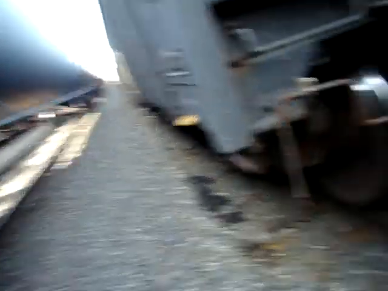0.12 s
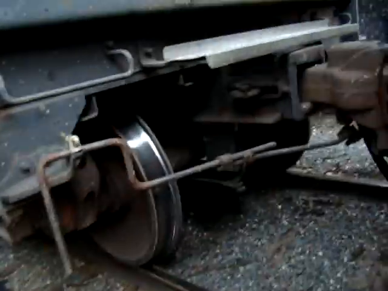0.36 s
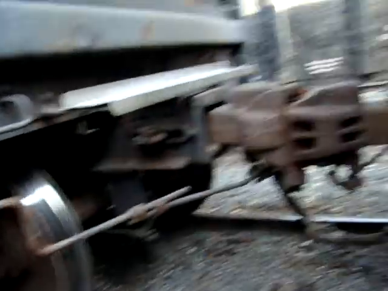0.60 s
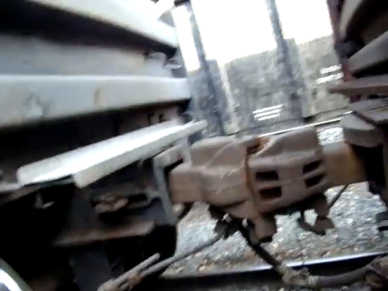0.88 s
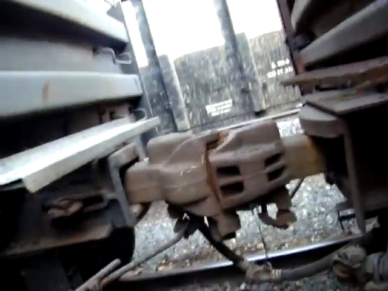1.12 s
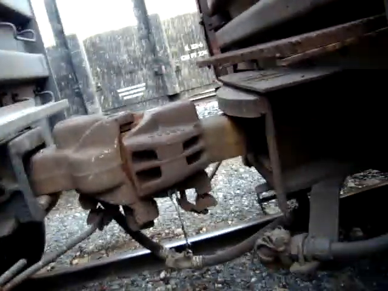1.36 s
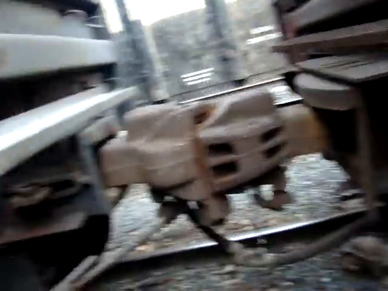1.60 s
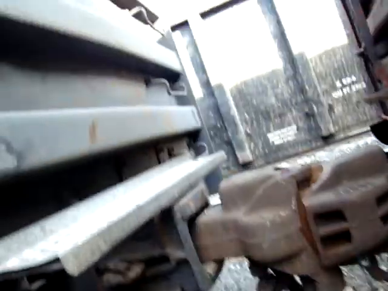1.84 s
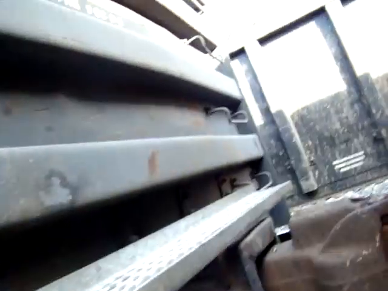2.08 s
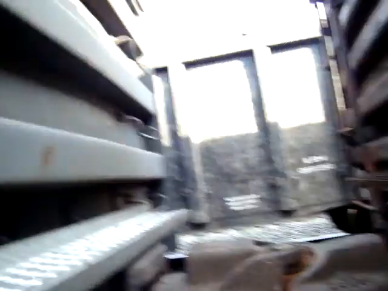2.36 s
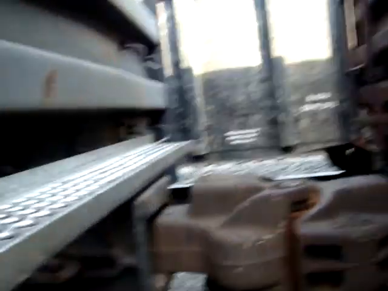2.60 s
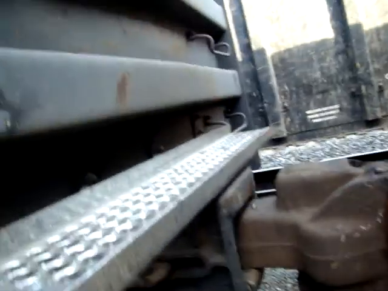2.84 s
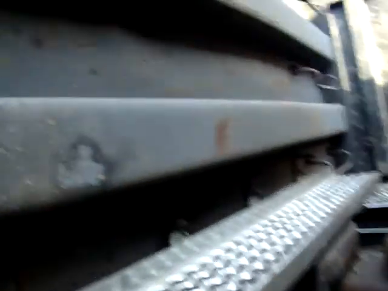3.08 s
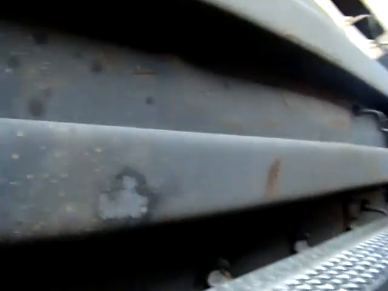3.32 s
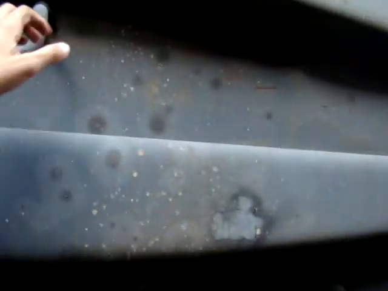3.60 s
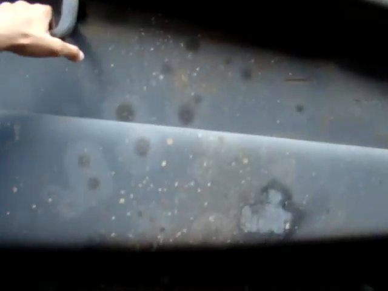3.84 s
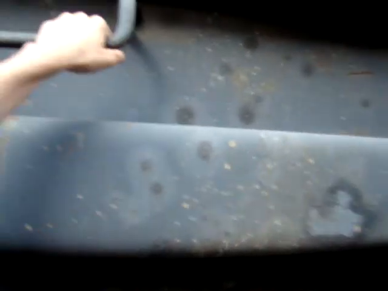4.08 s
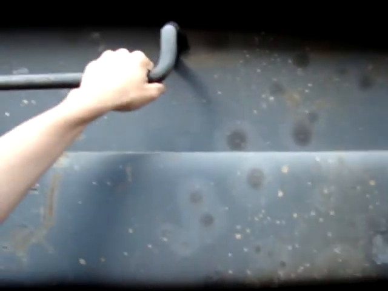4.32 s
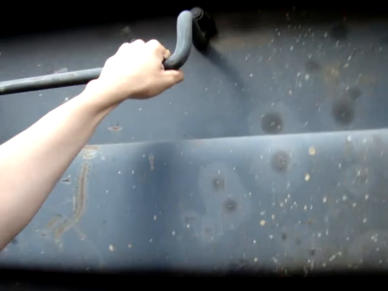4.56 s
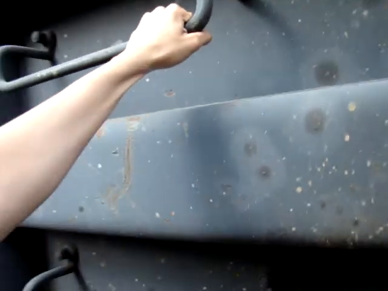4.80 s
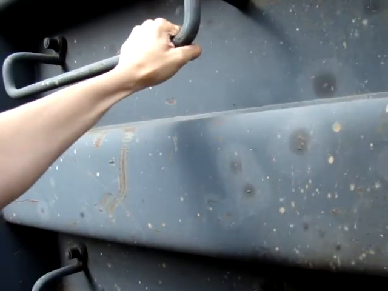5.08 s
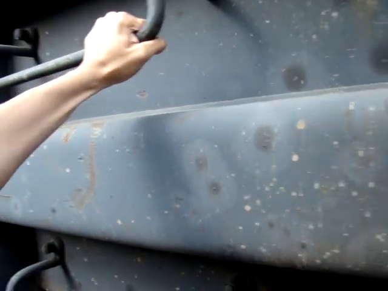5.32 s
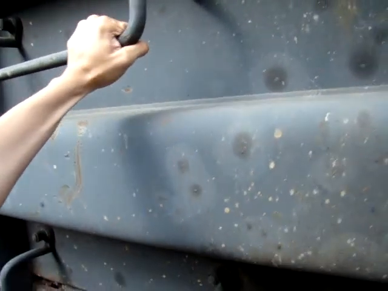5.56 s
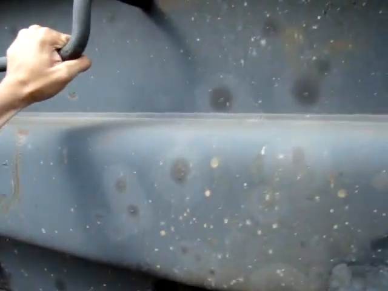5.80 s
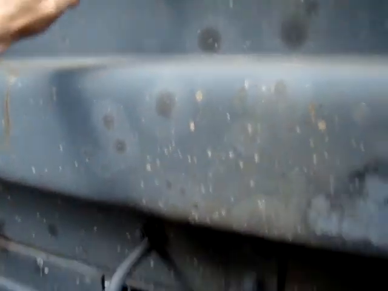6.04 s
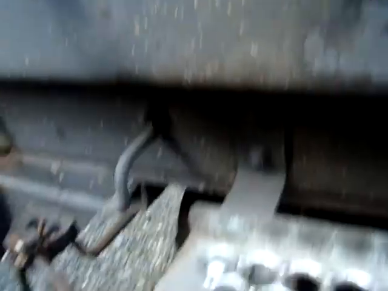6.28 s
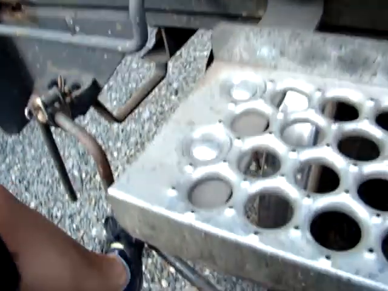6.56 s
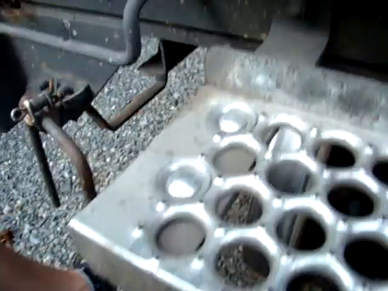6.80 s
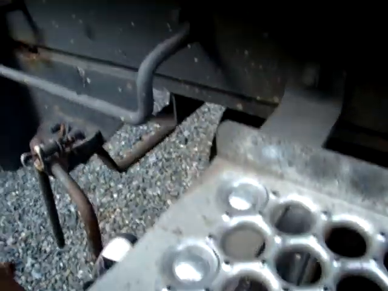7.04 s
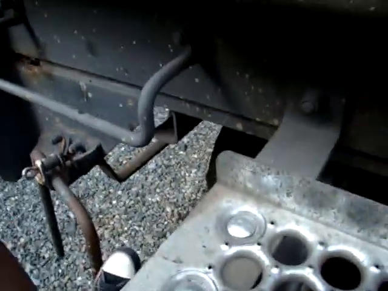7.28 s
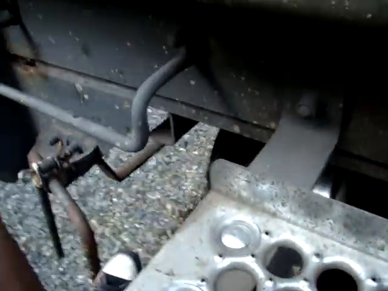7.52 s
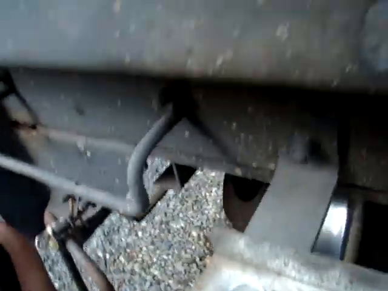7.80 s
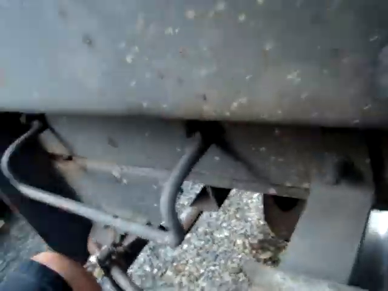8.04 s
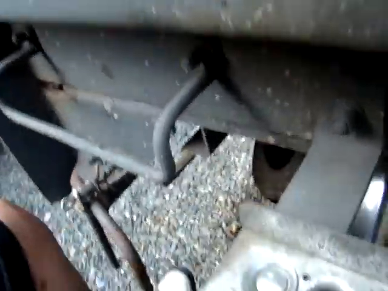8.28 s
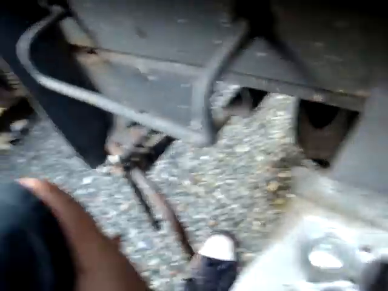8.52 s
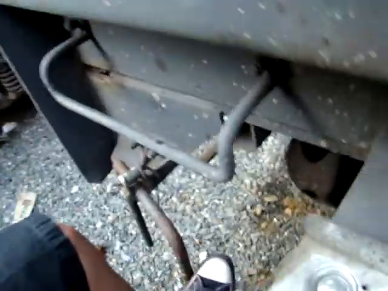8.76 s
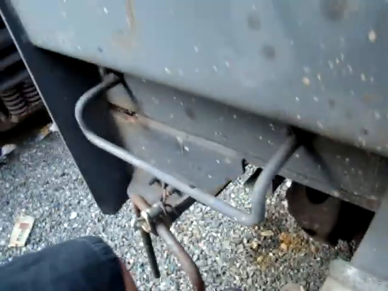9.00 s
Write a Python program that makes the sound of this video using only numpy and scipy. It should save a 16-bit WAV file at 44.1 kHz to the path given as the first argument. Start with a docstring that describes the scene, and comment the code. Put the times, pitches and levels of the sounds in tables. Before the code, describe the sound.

Close, rough handling knocks and gravel crunching give way to a quieter stretch of fine lens ticking, scattered taps, one hard metallic bang and faint squeaks.

```python
"""Footsteps on loose ballast

Someone walks on loose stones between parked freight cars and climbs onto a steel step, small camera in hand.
Stones crunch and slide as showers of short noise scratches, and cloth rustles as swells of shaped hiss.
Every jolt and knock sends a blow and rough noise through resonances: the hollow camera case rings.
The lens drive ticks 59.94 times a second, thin squeals are trembling sine tones, and steel parts sing and fade.
Shaped noise makes the drone of the yard, the puffs of wind and the hiss of the microphone."""
import sys
import numpy as np
from scipy import signal
from scipy.fft import rfft, irfft, next_fast_len
from scipy.io import wavfile
from scipy.ndimage import uniform_filter1d

SR = 44100
rng = np.random.default_rng(int(sys.argv[2]) if len(sys.argv) > 2 else 0)


def boost_factor(decibels):
    """Convert a level in decibels to a linear amplitude factor."""
    exponent = np.asarray(decibels, float) / 20
    return 10 ** exponent


def output_pcm(signal):
    """Save a mono or channel-first signal as 16-bit PCM at the path in sys.argv[1].

    Samples are clipped to [-1, 1] before scaling.
    """
    pcm = np.clip(np.atleast_2d(signal).T, -1, 1) * 32767
    wavfile.write(sys.argv[1], SR, np.round(pcm).astype(np.int16))


N = 403074  # length in samples

# All source levels are those ahead of record(), which bends and scales the mix.
# Resonance widths are for one pass of the filter; ring() makes two.

# Steady noise of the yard. Each row: frequency in Hz, strength per Hz in dB.
YARD_SPECTRUM = [(15, -73), (25, -33), (50, -13.5), (100, -20.5), (210, -7), (274, -4.5), (366, -7.5),
                 (760, -10.5), (1040, -8), (1240, -7.5), (1480, -10), (1760, -8.5), (2110, -16.5),
                 (2870, -13), (5000, -19), (6500, -21.5), (7500, -32), (7850, -21), (8200, -27.5),
                 (11000, -40)]
YARD_DB, HISS_DB = -49, -57
# Far engines. Each row: frequency in Hz, width in Hz, level in dB before it wavers.
ENGINES = [(289, 37, -60), (155.3, 32, -63.5)]
# Puffs of wind and arm swing on the microphone. Each row: peak time in seconds, half length in seconds,
# level in dB before the gusts.
PUFFS = [(0.096, 0.088, -42.5), (0.282, 0.036, -50), (0.527, 0.13, -52), (1.317, 0.031, -57),
         (1.53, 0.04, -56), (2.134, 0.094, -66), (3.466, 0.045, -56), (3.595, 0.016, -53),
         (3.696, 0.013, -60), (3.903, 0.034, -59), (4.83, 0.016, -43), (5.975, 0.049, -55),
         (5.82, 0.015, -56), (6.14, 0.01, -53), (6.188, 0.013, -49), (6.306, 0.035, -59), (8.056, .15, -67),
         (8.9, 0.066, -53)]
CALM_DB = -66.5  # rumble between the puffs

# Shoes pressing into the stones. Each row: start in seconds, hold in seconds, level of the grit in dB,
# level of the stone bed in dB.
STEPS = [(0.01, 0.14, -33.5, -36), (0.591, 0.12, -37.5, -41.5), (0.82, 0.074, -70, -50),
         (1.046, 0.26, -51, -53.5), (1.264, 0.11, -33.5, -38), (1.476, 0.091, -34, -38),
         (1.71, 0.97, -44.5, -50.5), (2.117, 0.086, -33.5, -35), (2.684, 0.18, -46.5, -46),
         (4.784, 0.14, -62, -47.5), (5.652, 0.51, -61, -56), (6.243, 0.087, -69, -40),
         (6.38, 0.11, -58, -41.5), (6.53, 0.054, -79, -41), (6.732, 0.19, -50, -58),
         (7.63, 0.018, -46, -74), (8.57, 0.23, -52.5, -50), (8.79, 0.49, -47, -49)]
STEP_RISE_S, STEP_T60_S = 0.013, 0.71
REST_GRIT_DB, REST_BED_DB = -55, -58  # stones keep shifting between the steps
# Colour of the grit. Each row: frequency in Hz, strength per Hz in dB.
GRIT_SPECTRUM = [(1200, -15.5), (2000, -12.5), (3000, -8), (4500, -4.5), (6500, -7.5), (8500, -5.5),
                 (11000, -10)]
TREBLE_WAVER_DB = 2.5  # the level of the grit's top wavers at random
# Ringing of stones of four sizes: one frequency in Hz for each.
CLACK_HZ = [1000, 1490, 2020, 2700]
CLACK_DB = -14  # against the grit
# Rustle of the case in the hand. Each row: time in seconds, level in dB.
GRIP = [(0, -43), (.2, -34.5), (.36, -52), (.55, -38.5), (.9, -52), (1.07, -30.5), (1.25, -45.5),
        (1.45, -37), (1.62, -39), (1.88, -34), (2.1, -41.5), (2.47, -43.5), (2.87, -39), (3.1, -59),
        (3.3, -45), (3.94, -47.5), (4.3, -56), (4.81, -49), (5.4, -61.5), (5.83, -49), (6.46, -54.5),
        (6.7, -74), (6.9, -52), (7.05, -63), (7.69, -54), (8.3, -58), (8.63, -49.5), (9.14, -46.5)]

# Soft even hiss, as of cloth sliding. Each row: start, rise, hold and fall in seconds, level in dB
# before it flutters.
RUSTLES = [(.01, .02, 0.094, 0.089, -44), (.22, .03, 0.088, 0.054, -49.5), (0.402, .03, 0.094, .03, -59.5),
           (.59, 0.018, 0.15, .05, -47.5), (0.756, .02, 0.11, 0.017, -53.5), (1.038, .02, 0.16, .03, -52),
           (1.265, 0.018, 0.38, 0.087, -47), (1.656, 0.027, .4, .04, -54.5), (2.129, .02, 0.12, .15, -40),
           (2.3, 0.042, 0.21, 0.25, -54), (4.796, .07, 0.078, .06, -51.5), (7.636, .01, 0.026, .03, -53),
           (5.607, 0.094, 0.55, .04, -46.5), (6.742, .06, 0.2, .04, -51.5), (8.536, 0.12, .4, .1, -47)]
# Colour of that hiss. Each row: frequency in Hz, strength per Hz in dB.
RUSTLE_SPECTRUM = [(400, -14), (1000, -1.5), (2500, 1), (5000, -2), (8000, 0), (11000, -8)]

# Ringing of one lens step. Each row: frequency in Hz, width in Hz, gain in dB.
TICK_MODES = [(1824, 330, -21), (1282, 240, -6), (3000, 400, -17)]
# Lens steps with a level of their own, loud or faint. Each row: time in seconds, peak level in dB.
SET_TICKS = [(3.2326, -29.5), (3.5663, -28), (3.934, -30.5), (4.0677, -33), (4.1011, -33), (4.1345, -29),
             (4.1829, -32), (4.2014, -29.5), (4.2338, -27), (4.4009, -30), (4.4493, -49), (4.4677, -29),
             (4.5346, -32), (4.6354, -31), (4.6683, -29), (4.7346, -35), (4.7691, -38), (5.002, -31),
             (5.2684, -41), (5.4854, -42), (5.6027, -34), (5.6695, -35), (5.7364, -41), (5.9354, -40),
             (6.0023, -31), (6.4852, -46), (6.5036, -32), (6.5705, -39), (6.6189, -34), (6.6518, -41),
             (6.6852, -39), (6.9694, -51), (7.2379, -40), (7.2858, -33), (7.3043, -30), (7.4195, -34),
             (7.4864, -42), (7.6196, -34), (7.9199, -47), (8.105, -31), (8.1863, -42), (8.2531, -43),
             (8.3205, -39), (8.4387, -30), (8.539, -39)]
TICK_START_S, TICKS_PER_S = .0115, 59.94
TICK_DB, WEAK_TICK_DB = -34, -5  # loudest of the other steps; how much every second one is weaker
TICK_SCATTER_DB = 9  # each of them is quieter by a random amount up to this

# Jolts and knocks. Each row: start in seconds, case ring in dB, then upper case ring, scrape and thud in dB
# relative to the case ring. These are peak levels.
KNOCKS = [(.039, -24, -2.5, -13, 2.5), (0.102, -31.5, -10, -6.5, 6.5), (0.1728, -26, 7.5, -16, -24),
          (0.1851, -13.5, 0, 3, -23), (0.2513, -29.5, -8, 9, 0), (0.4092, -23, -1.5, -27, -17),
          (0.4211, -19.5, 2.5, 5.5, -18), (.434, -22, -2, -13.5, -12), (0.557, -19.5, 0.5, 3.5, -14),
          (0.5643, -25, 5, 7.5, -18), (0.586, -31, -11, -17, -16), (0.607, -31.5, -21, 7.5, -13),
          (0.732, -24, -20, -14, -1), (0.749, -28.5, -11, -22, -4), (0.7638, -20, -1.5, -4.5, -12),
          (0.801, -20, 2, -3, -24), (0.827, -20, 0, 0.5, -36), (0.865, -24.5, 0, -6, -17),
          (0.8707, -30.5, 9.5, -18, -11), (0.8832, -23, 1, -5, -19), (.952, -24.5, 2.5, -1, -10),
          (.969, -19, -2, -54, -31), (1.059, -25.5, 2.5, -1, -21), (1.0686, -28, -1, -7, -23),
          (1.099, -31, 5, 2.5, -24), (1.126, -41, -1, -14.5, -25), (1.191, -39, 0, 1, -9),
          (1.288, -31.5, -11, 5, 2), (1.3043, -18, -4.5, 5.5, 0.5), (1.321, -27, -5, -32, -9),
          (1.344, -28.5, -11, 5.5, 4), (1.4361, -18.5, -3.5, -3, -8), (1.448, -15, -6, -28, -8.5),
          (1.475, -18, -2.5, 5.5, -14), (1.495, -23, 1, -11.5, -3), (1.512, -26, -13, -20, -3),
          (1.684, -25, -4, -27, -52), (1.717, -15.5, -2, -1, -29), (1.787, -16.5, 1.5, 3, -15),
          (1.812, -13, -0.5, -40, -17), (1.828, -13.5, -2, 5.5, -29), (1.836, -19, -13, -7.5, -24),
          (1.8504, -23.5, -1, -19, -23), (1.8741, -24.5, 7, 4, -17), (1.897, -20.5, -2.5, 3.5, -33),
          (1.93, -26, -4, 2, -18), (1.94, -22, 2, -2.5, -21), (1.9507, -21, 0, 2.5, -17),
          (1.9661, -20, -3, -7, -12), (1.986, -15, -7, -37, -16), (2.025, -29, -22, 1, -8),
          (2.082, -45.5, -6, 14, -13), (2.1438, -25.5, -21, 4.5, -0.5), (2.183, -31, -11, -5.5, -9),
          (2.203, -29.5, -1, 2.5, -8), (2.221, -29.5, -13, -7, -2), (2.236, -35, -8, 2, 7),
          (2.383, -33.5, -3, 8, 3), (2.424, -33, -3, 6, -6), (2.4054, -26.5, -4, -24, -7),
          (2.4637, -14.5, -2, 3, -28), (2.4725, -18, 2.5, -35, -3), (2.486, -24, -9, -38, -5),
          (2.495, -20, -5, -33, -7), (2.5065, -17, 4.5, -12, -17), (2.534, -26, 5.5, -0.5, -22),
          (2.7396, -27.5, -15, -4.5, -12), (2.789, -28, -21, -22, -17), (2.82, -29, -18, -12, -7),
          (2.8393, -35, -12, -8, 4), (2.865, -41, 4, -8, -10), (2.889, -26.5, -15, -14.5, -28),
          (3.135, -29.5, -1, -18, 11.5), (3.1965, -30, 0, -2, -6), (3.314, -36, -2.5, -1, -7),
          (3.3827, -27.5, 0, -8.5, -13), (3.5246, -27.5, -6, -5.5, -9), (3.599, -31.5, -10, -5, -3),
          (3.6928, -30, -4, -10, -7), (3.782, -24, -12, -5.5, -16), (3.8006, -25, -10, -15, -9),
          (3.8833, -25, -9.5, -21, -11), (3.8961, -32, -3, -23, -12), (4.867, -29, -5, -3.5, -19),
          (4.887, -30.5, -11, -12, -14), (4.965, -38, -12, -15, -12), (4.915, -24, -15, -9, -8.5),
          (5.153, -32.5, -6, -20, -24), (5.197, -32, -3, -10, -16), (5.2603, -37, 2.5, -13, -6),
          (5.5537, -24.5, -12, -11, -16), (5.568, -21.5, -18, -22, -27), (5.816, -34.5, -1, 10.5, -1.5),
          (5.8504, -34.5, 1.5, -3.5, -24), (5.9998, -36.5, -15, -7.5, -15), (6.056, -20.5, -27, -13, -12),
          (6.072, -14, -9, -12, -28), (6.0934, -28, -8, -1, -15), (6.169, -32, -2, -15, -20),
          (6.183, -43, -10, -13, 6), (6.2679, -20.5, -29, -30, -8), (6.3375, -17.5, -4, -4.5, -24),
          (6.3507, -24, 2.5, -19, -8), (6.422, -27, -8, -23, -15), (6.562, -34.5, -2, -25, 2),
          (6.759, -31, -4, -12, -11), (6.772, -37, -8, -18, -11), (6.888, -30, -17, -18, -12),
          (7.1295, -28.5, -7, -8, -23), (7.1677, -34.5, -0.5, -15, -14), (7.356, -36.5, 0, -4, -26),
          (7.3666, -29.5, -17, -14, -12), (7.72, -28.5, -7, -5, -14), (7.845, -32.5, -13, -19, -5),
          (7.869, -35, -0.5, 4, -5), (8.0214, -28, -5, -4, -9), (8.334, -36, 3, -20, -15),
          (8.369, -37, 1, -14, -11), (8.6582, -34, 8, 8, -4), (8.71, -34.5, 3, 6, 0),
          (8.823, -25, -8, -2, -12), (8.9278, -36.5, 9.5, 3, -2)]
# Hard blows and footfalls. Each row: the five columns of the knocks, then skid in seconds, its t60 in seconds,
# how long the push is held in seconds, its t60 in seconds, size of the first contact (a plain factor),
# top of the scrape in Hz, rise in seconds.
STOMPS = [(0.4705, -8, -5, 1, -40, 0.0075, 0.012, 0.0025, 0.016, 0.2, 11900, 0.0015),
          (0.9873, -2, -10, -2.5, -16.5, 0.025, 0.087, 0.0099, 0.017, 1.5, 12100, 0.001),
          (2.5089, -3.5, -5.5, 1, -47, 0.0055, 0.015, .003, 0.0079, 1.2, 12300, 0.0016),
          (2.6573, -11.5, -5.5, -9, -40, 0.0012, .016, .001, 0.047, 1.1, 9000, 0.0014),
          (3.101, -26, 9.5, 14.5, 18.5, 0.013, 0.14, .001, 0.062, 1.5, 4430, 0.00069),
          (3.4185, -9.5, -5.5, -1, -24.5, 0.0033, 0.0099, 0.0049, 0.024, 0.28, 12000, 0.0024),
          (6.718, -2, -4.5, -1.5, -19, 0.00053, 0.0052, 0.00079, 0.024, 1.8, 6000, 0.001),
          (9.1095, -34, 8, 15.5, 4.5, 0.0011, 0.022, .001, 0.034, 0.75, 4930, 0.001)]
# Lower ringing of the hollow case. Each row: frequency in Hz, width in Hz, gain in dB.
CASE_LOW = [(1168, 356, 5), (1263, 303, 6.5)]
# Upper ringing of the case. Each row: frequency in Hz, width in Hz, gain in dB.
CASE_HIGH = [(1747, 254, -1.5), (2224, 590, -4)]
# Thin part of the case that scrapes excite. Each row: frequency in Hz, width in Hz, gain in dB.
SHELL = [(4630, 180, -6)]
# Dull ringing of struck things and of the stone bed. Each row: frequency in Hz, width in Hz, gain in dB.
THUD = [(409, 315, -4), (507, 336, -0.5), (854, 500, -3.5)]
GRIP_SHIFT = 0.033  # typical share by which the case rings higher or lower from knock to knock
BLOW, SETTLE = 1, 0.084  # size of the first contact and of the long tail, against the push
CRACK_S, CRACK = 0.0026, 0.58  # decay and size of the crack at first contact
CLATTER_DB = 2.5  # a scrape breaks up into separate contacts
SCRAPE_T60_S = 0.017  # of a knock
PUSH_T60_S, SCRAPE_TOP_HZ = 0.038, 6000  # of a knock at -30 dB
HARD_SHORTER, HARD_BRIGHTER = 0.011, 0.12  # for each dB above that: push shorter, scrape top higher (shares)
SOFT_EDGE, SOFT_RISE_S = 0.58, 0.0027  # knocks have this share of the first contact and swell over this time

# Soft bumps of the hand on the case. Each row: peak time in seconds, half length in seconds, frequency in Hz,
# level in dB.
BUMPS = [(.07, .03, 74.4, -39), (.135, 0.03, 95, -35), (.235, .025, 88, -42), (.283, 0.011, 145, -32),
         (.32, 0.01, 85, -41), (.425, .012, 115, -45), (.487, .012, 179, -47), (.53, 0.011, 110, -49),
         (.585, 0.016, 115, -47), (.64, 0.013, 100, -54), (4.835, 0.0067, 120, -45)]

# Thin squeals, one list each. Each row: time in seconds, pitch in Hz, level in dB before a 10 dB lift.
SQUEALS = [
    [(0.21, 4820, -64), (0.246, 4960, -46), (0.284, 5000, -56), (0.3, 4826, -69)],
    [(4.32, 5670, -60), (4.364, 5400, -59), (4.41, 5900, -60), (4.43, 5950, -71)],
    [(6.41, 4800, -72), (6.47, 4800, -61), (6.512, 4795, -52), (6.55, 4790, -67), (6.62, 4785, -79)],
    [(8.74, 5500, -62), (8.766, 5350, -53), (8.805, 5180, -46.5), (8.85, 5050, -55), (8.95, 4850, -63)],
    [(8.9, 4600, -66), (8.98, 4605, -51), (9.068, 4610, -52), (9.09, 4605, -60), (9.17, 4590, -60)],
]
# How far the pitch of each squeal trembles, as a share.
SQUEAL_BLUR = [0.0216, 0.086, 0.003, 0.03, 0.003]

# Moments when steel parts start to sing, in seconds.
SING_START_S = [8.822, 6.4, 3.83, 8.08, 8.08, 6.725]
# What they sing. Each row: frequency in Hz, level in dB, t60 in seconds.
SING_TONES = [(1289, -28.5, 0.35), (381, -40.5, 1), (447, -43.5, 0.82), (438, -40, 0.39), (277, -42, 0.69),
              (1310, -34, 0.27)]

LOPSIDED = 0.2  # uneven overload: the hardest knocks gain a low thump
TOP_HZ, CLIP = 10080, .71  # top of the sound; highest sample value


def unit(x):
    """Scales a sound to rms 1."""
    return x / np.sqrt(np.mean(x ** 2))


def ring(x, modes, shift=1):
    """Sum of resonances, each applied twice for steep skirts; neighbours in opposite phase."""
    out = 0
    for k, (hz, width, db) in enumerate(modes):
        b, a = signal.iirpeak(hz * shift, hz / width, SR)
        once = signal.lfilter(b, a, x)
        out = out + (-1) ** k * boost_factor(db) * signal.lfilter(b, a, once)
    return out


def colour(x, points):
    """Shapes the spectrum along (Hz, dB) points."""
    hz, db = np.transpose(points)
    size = next_fast_len(len(x))
    log_hz = np.log(np.maximum(np.arange(size // 2 + 1) * SR / size, 1))
    gain = boost_factor(np.interp(log_hz, np.log(hz), db))
    return irfft(rfft(x, size) * gain, size)[:len(x)]


def walk(rate):
    """Random curve of rms 1: levels held for 1 / rate seconds, smoothed twice."""
    k = int(SR / rate)
    held = np.repeat(rng.standard_normal(N // k + 1), k)
    return unit(uniform_filter1d(uniform_filter1d(held, k), k)[:N])


def curve(table):
    """Columns of a table that starts with seconds, at every sample."""
    s, *columns = np.transpose(table)
    return [np.interp(np.arange(N) / SR, s, c) for c in columns]


def yard():
    """Steady broad noise with wavering engine drones, which are noise through narrow resonances."""
    out = boost_factor(YARD_DB) * unit(colour(rng.standard_normal(N), YARD_SPECTRUM))
    for hz, width, db in ENGINES:
        engine = unit(ring(rng.standard_normal(N), [(hz, width, 0)]))
        out = out + boost_factor(db + 1.0 * walk(3.1)) * engine
    return out


def microphone_hiss():
    """Even white noise of the microphone."""
    return boost_factor(HISS_DB) * rng.standard_normal(N)


def wind():
    """Gusty low rumble that swells with each puff on the microphone."""
    t = np.arange(N) / SR
    gusts = boost_factor(2 * walk(20))
    low_band = signal.butter(3, [62, 210], "band", fs=SR, output="sos")
    rumble = signal.sosfilt(low_band, rng.standard_normal(N) * gusts)
    size = boost_factor(CALM_DB) + sum(boost_factor(db) * np.exp(-((t - s) / half) ** 2) for s, half, db in PUFFS)
    return size * unit(rumble)


def stones(per_s, spread_db, smear_s):
    """Dense stone contacts of unequal size, each a short scratch of noise."""
    chance = np.minimum(rng.exponential(size=N), 3)
    hits = (rng.random(N) < per_s / SR) * boost_factor(spread_db * chance)
    fade = np.exp(-1 / (smear_s * SR))
    return rng.standard_normal(N) * signal.lfilter([1], [1, -fade], hits)


def grit_half(side):
    """Scratching stones with a little steady noise, kept only below ("low") or above ("high") 4800 Hz."""
    scratches = unit(stones(1300, 8.4, 0.0023)) + 0.11 * rng.standard_normal(N)
    split = signal.butter(3, 4800, side, fs=SR, output="sos")
    return signal.sosfilt(split, colour(scratches, GRIT_SPECTRUM))


def gravel():
    """Under each step grit hisses, single stones clack and the bed of stones shifts below."""
    t = np.arange(N) / SR
    grit_size, bed_size = boost_factor(REST_GRIT_DB), boost_factor(REST_BED_DB)
    for s, hold, grit_db, bed_db in STEPS:
        fade = boost_factor(-60 * np.maximum(t - s - hold, 0) / STEP_T60_S)
        weight = np.clip((t - s) / STEP_RISE_S, 0, 1) * fade
        # independent noises add by power
        grit_size = np.hypot(grit_size, boost_factor(grit_db) * weight)
        bed_size = np.hypot(bed_size, boost_factor(bed_db) * weight)
    # low and high halves of the grit hiss are made separately; the high half wavers
    low, high = grit_half("low"), grit_half("high")
    grit = unit(low + high * boost_factor(TREBLE_WAVER_DB * (walk(15) - .5)))
    clack = unit(sum(ring(stones(44, 2.5, 0.0005), [(hz, hz / 3, 0)]) for hz in CLACK_HZ))
    bed = unit(ring(stones(400, 3, 0.006), THUD))
    return grit_size * (grit + boost_factor(CLACK_DB) * clack) + bed_size * bed


def grip():
    """The gripping hand rustles the case: many tiny contacts make it ring."""
    tremor = stones(300, 2.4, .003)
    case = unit(ring(tremor, CASE_LOW) + ring(tremor, CASE_HIGH))
    return boost_factor(curve(GRIP)[0]) * case


def rustle():
    """Smooth swells of fluttering hiss, as of cloth sliding."""
    t = np.arange(N) / SR
    size = 0
    for s, rise, hold, fall, db in RUSTLES:
        corners = np.cumsum([s, rise, hold, fall])
        size = size + boost_factor(db) * np.interp(t, corners, [0, 1, 1, 0])
    flutter = boost_factor(1.3 * walk(25))
    return size * flutter * unit(colour(rng.standard_normal(N), RUSTLE_SPECTRUM))


def lens_drive():
    """Evenly timed ticks, every second one weaker, and now and then the pattern swaps."""
    times = np.arange(TICK_START_S, N / SR, 1 / TICKS_PER_S)
    swaps = np.cumsum(rng.random(len(times)) < .04)
    weak = (np.arange(len(times)) + swaps) % 2 == 0
    steps = np.zeros(N)
    tick_db = TICK_DB + WEAK_TICK_DB * weak - TICK_SCATTER_DB * rng.random(len(times))
    steps[(times * SR).astype(int)] = boost_factor(tick_db)
    for s, db in SET_TICKS:
        nearest = times[np.abs(times - s).argmin()]
        steps[int(nearest * SR)] = boost_factor(db)
    # each step is a short shove of tone and noise, not a spike
    size = int(.005 * SR)
    swell = np.hanning(size)
    tone = swell * np.sin(2 * np.pi * 1800 * np.arange(size) / SR)
    shove = tone + 1.3 * swell * rng.standard_normal(size)
    tick = ring(np.pad(shove, (0, 800)), TICK_MODES)
    return signal.fftconvolve(steps, tick / np.abs(tick).max())[:N]


def lowpass(x, hz):
    """Takes away what lies above a frequency, with a gentle slope."""
    return signal.lfilter(*signal.butter(2, hz, fs=SR), x)


def strike(size, db, upper_db, scrape_db, thud_db, skid, scrape_t60, held, push_t60, edge, top_hz, rise_s):
    """A blow, its crack and the rough push after it ring the case; the struck thing scrapes and thuds."""
    t = np.arange(size) / SR
    noise = rng.standard_normal(size)
    shift = 1 + GRIP_SHIFT * rng.standard_normal()

    def fade(hold, t60):
        """Stays full for the hold, then falls by 60 dB in t60."""
        return np.exp(-np.log(1000) * np.maximum(t - hold, 0) / t60)

    late = t - .0015  # the first contact peaks here
    blow = BLOW * np.exp(-(late / 0.000093) ** 2)
    crack = CRACK * (late > 0) * np.exp(-late / CRACK_S)
    rise = (1 - np.exp(-t / rise_s)) ** 2
    push = edge * blow + noise * rise * fade(held, push_t60)
    fast = rise * fade(skid, scrape_t60)
    # loose stones settle for longer, and only their duller part carries
    slow = SETTLE * rise * fade(0, 7.8 * scrape_t60)

    clatter = uniform_filter1d(np.repeat(rng.standard_normal(size // 100), 100), 60)
    scratch = signal.lfilter(*signal.butter(2, 2100, "high", fs=SR), noise)
    sharp = lowpass((scratch + ring(noise, SHELL)) * boost_factor(CLATTER_DB * clatter), top_hz)
    soft = lowpass(sharp, min(top_hz, 5500))
    scrape = 2.4 * sharp * (fast + edge * crack) + soft * (fast + 1.9 * slow)
    thud = ring(4 * edge * blow + noise * (fast + slow), THUD, shift)
    parts = [(ring(push, CASE_LOW, shift), 0), (ring(push, CASE_HIGH, shift), upper_db),
             (scrape, scrape_db), (thud, thud_db)]
    return sum(boost_factor(db + rel_db) * p / np.abs(p).max() for p, rel_db in parts)


def knocks():
    """Places every strike in time; harder knocks push more briefly and scrape more brightly."""
    events = list(STOMPS)
    for row in KNOCKS:
        harder = row[1] + 30
        push_t60 = PUSH_T60_S * np.exp(-HARD_SHORTER * harder)
        top_hz = min(SCRAPE_TOP_HZ * np.exp(HARD_BRIGHTER * harder), SR / 3)
        events.append((*row, 0, SCRAPE_T60_S, 0, push_t60, SOFT_EDGE, top_hz, SOFT_RISE_S))
    size = 9000  # samples kept of each strike
    out = np.zeros(N + size)
    for s, *settings in events:
        start = int(s * SR)
        out[start:start + size] += strike(size, *settings)
    return out[:N]


def bumps():
    """Short low swings of the microphone in its mount: sines that swell and fade."""
    t = np.arange(N) / SR
    out = 0
    for s, half, hz, db in BUMPS:
        swell = np.exp(-((t - s) / half) ** 2)
        out = out + boost_factor(db) * swell * np.sin(2 * np.pi * hz * (t - s))
    return out


def squeals():
    """Thin tones that fade in and out; the more the pitch trembles, the more they blur into a whisper."""
    out, t = 0, np.arange(N) / SR
    for table, blur in zip(SQUEALS, SQUEAL_BLUR):
        hz, db = curve(table)
        first, last = table[0][0], table[-1][0]
        gate = np.clip(np.minimum(t - first, last - t) / 0.022, 0, 1)
        size = gate * boost_factor(db + 10.0 + 3.9 * walk(71))
        turns = np.cumsum(hz * (1 + blur * walk(1400))) / SR
        out = out + size * np.sin(2 * np.pi * turns)
    return out


def singing_steel():
    """Lone tones of the steelwork that start quickly and die away evenly."""
    out = 0
    for s, (hz, db, t60) in zip(SING_START_S, SING_TONES):
        t = np.maximum(np.arange(N) / SR - s, 0)
        size = boost_factor(db) * (1 - np.exp(-t / 0.004)) * np.exp(-np.log(1000) * t / t60)
        out = out + size * np.sin(2 * np.pi * hz * t)
    return out


def scene():
    """All sources at one microphone."""
    background = yard() + microphone_hiss() + wind()
    walking = gravel() + grip() + rustle()
    handling = lens_drive() + knocks() + bumps()
    return (background + walking + handling + squeals() + singing_steel())[None]


def top_cut(x):
    """Nothing passes above the cut-off."""
    return signal.sosfilt(signal.butter(12, 10150, fs=SR, output="sos"), x)


def record(dry):
    """The camera cuts the top, rounds the hard knocks and clips the hardest."""
    cut = signal.sosfilt(signal.ellip(8, .2, 60, TOP_HZ, fs=SR, output="sos"), dry)
    uneven = cut - LOPSIDED * np.abs(cut) ** 3
    bent = signal.lfilter(*signal.butter(1, 35, "high", fs=SR), uneven)
    rounded = np.tanh(0.55 * bent) / 0.83
    return top_cut(np.clip(rounded, -CLIP, CLIP))


dry = scene()
out = record(dry)
output_pcm(out)
```